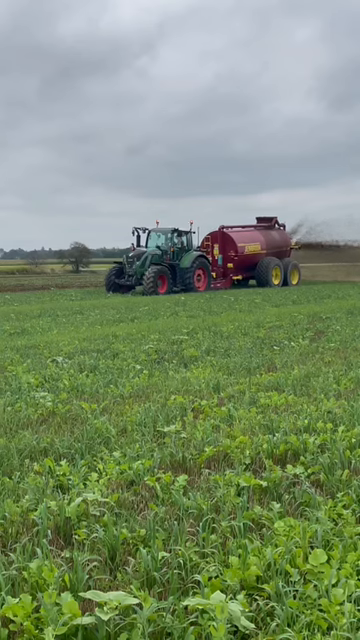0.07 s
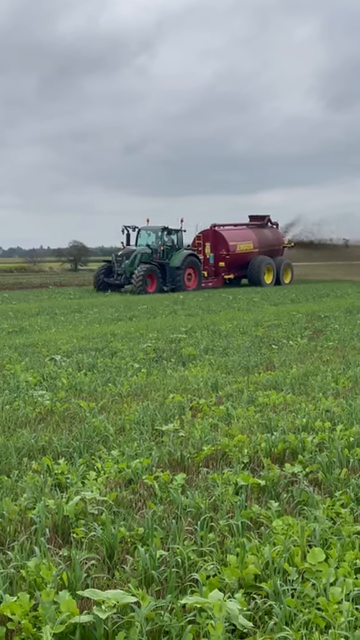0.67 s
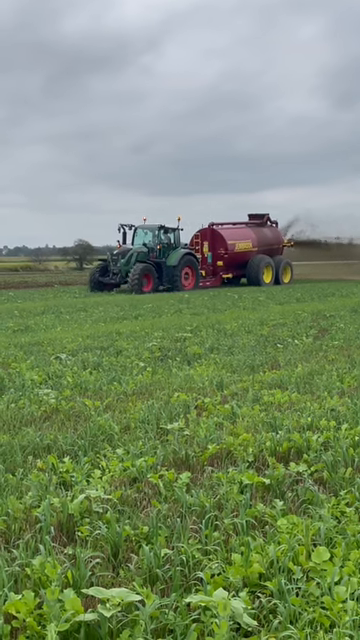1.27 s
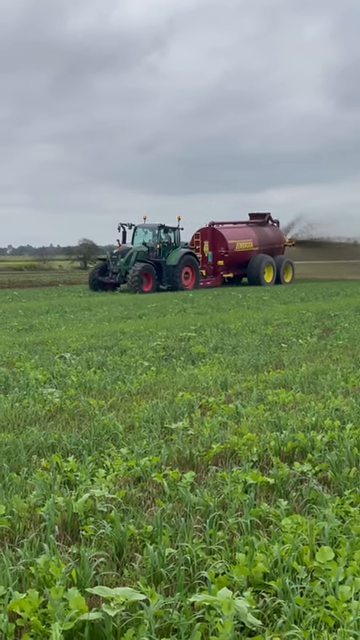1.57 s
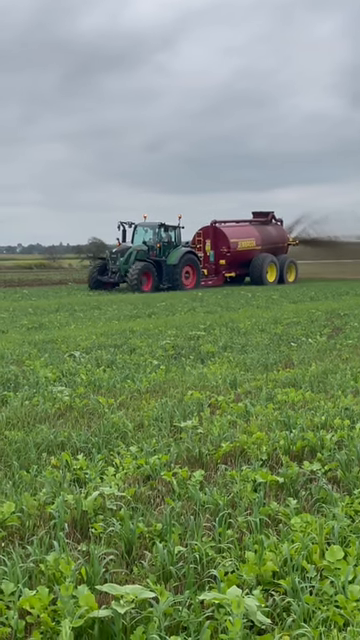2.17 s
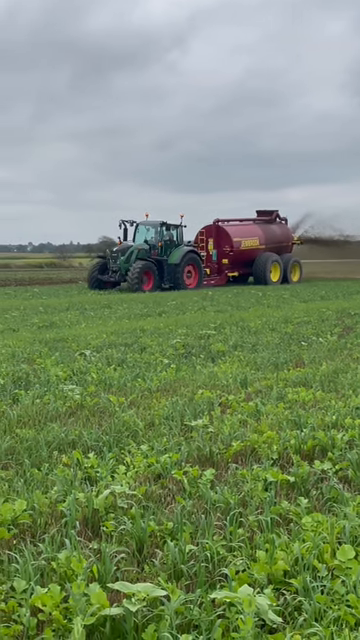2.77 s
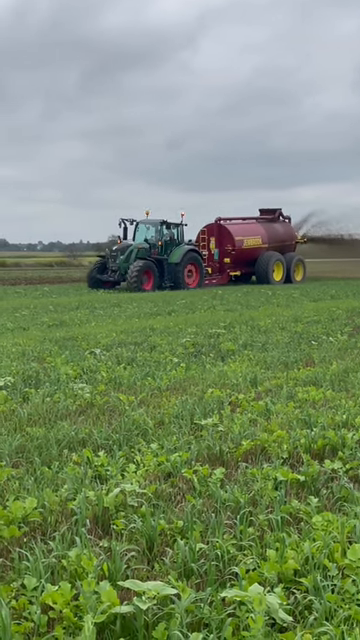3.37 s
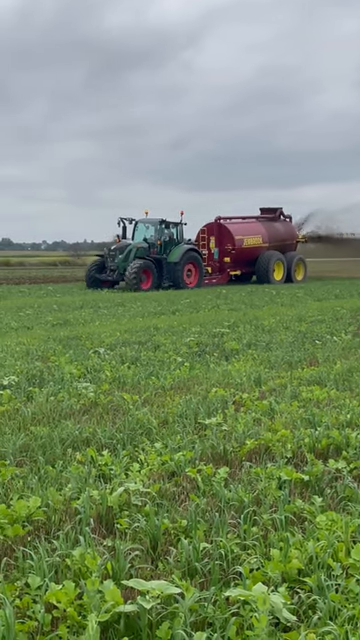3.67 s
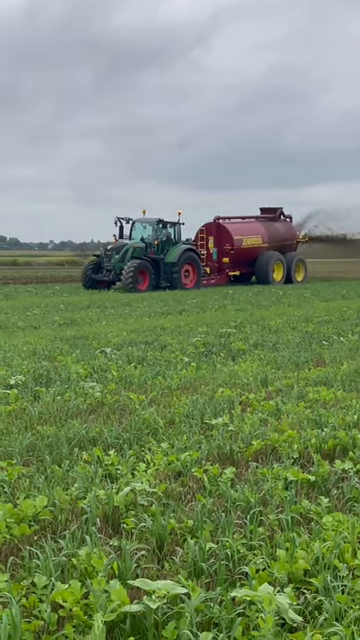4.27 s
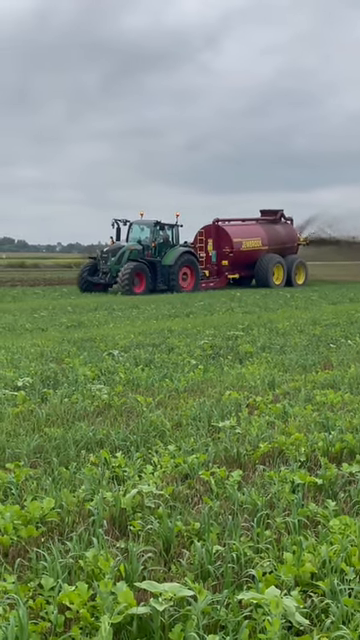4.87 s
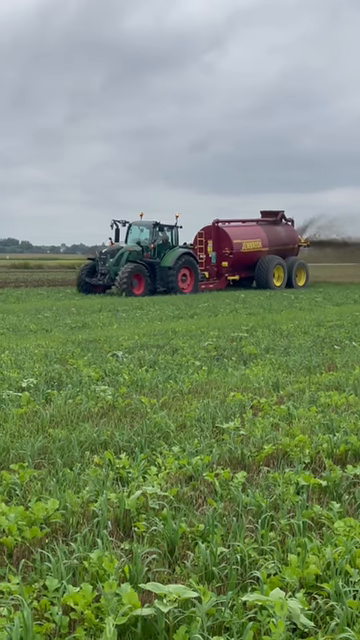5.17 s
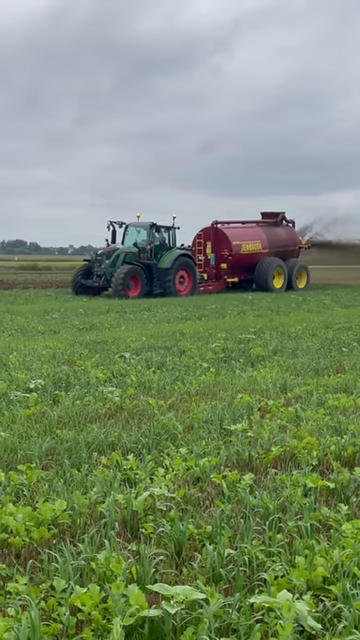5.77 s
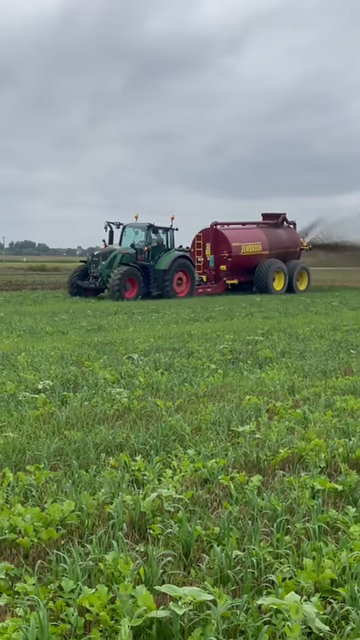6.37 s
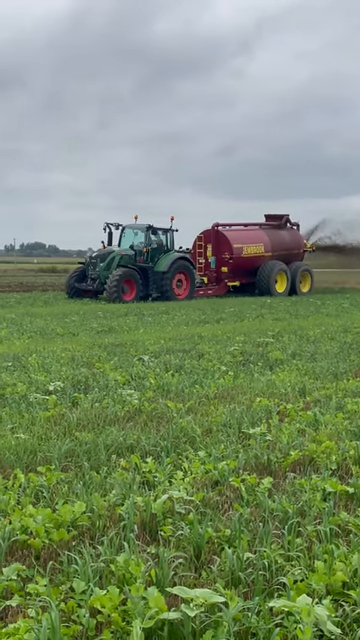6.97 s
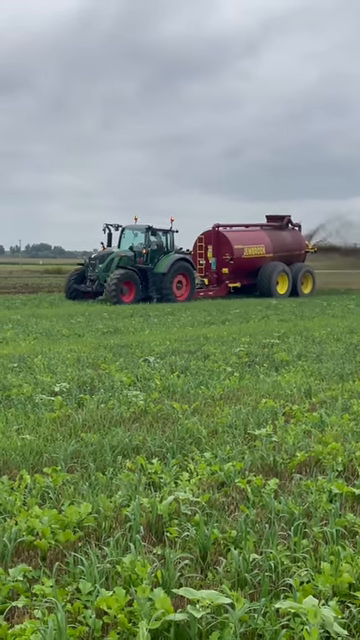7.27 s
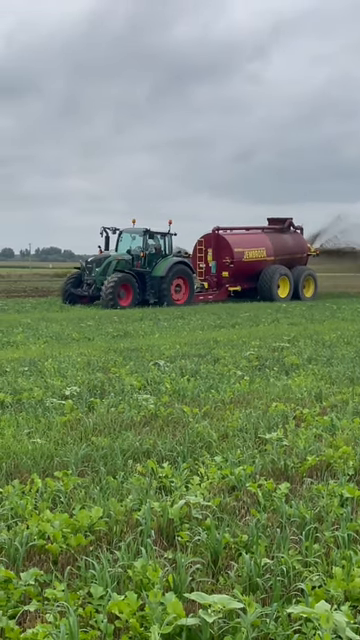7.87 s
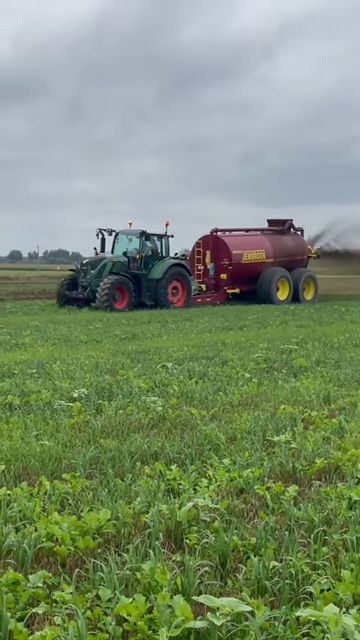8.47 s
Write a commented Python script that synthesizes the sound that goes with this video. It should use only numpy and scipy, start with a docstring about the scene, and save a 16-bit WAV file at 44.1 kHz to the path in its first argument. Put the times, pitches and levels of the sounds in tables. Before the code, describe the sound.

Out in a field, a tractor engine drones without a break, heavy and pulsing in the bass, with diesel clatter on top. The slurry tanker behind it adds a throbbing pump and an even, pattering hiss of spray. A thin gear whine and a soft steel rattle come and go as the machine creeps a little closer, never changing its engine speed.

```python
"""A six-cylinder diesel tractor slowly approaches across an open field, drawing a slurry tanker.
Periodic exhaust pulses beat against the tanker's pump over a lumpy rumble, and the cylinders' knocks
excite the resonances of the block. A panel booms, a fan hums, and gear whine and ringing steel fade
in and out on the breeze. Slurry hisses and patters behind. Two close microphone ports hear the machine."""
import sys
import numpy as np
from scipy import signal
from scipy.fft import rfft, irfft
from scipy.io import wavfile

SR = 44100
rng = np.random.default_rng(int(sys.argv[2]) if len(sys.argv) > 2 else 0)


def to_wav(s):
    """Save 16-bit WAV."""
    ch = np.atleast_2d(s).T  # columns
    pcm = np.round(np.clip(ch, -1, 1) * 32767)  # PCM
    wavfile.write(sys.argv[1], SR, pcm.astype(np.int16))


N = 379701
TIME, HZ = np.arange(N) / SR, np.fft.rfftfreq(N, 1 / SR)
PROGRESS = TIME / TIME[-1] - .5  # -0.5 at the start, +0.5 at the end
SIDES = np.array([[1], [-1]])  # left, right
CYCLE_HZ, PUMP_HZ = 16.095, 33.835  # four-stroke cycles (six firings each); turns of the pump's rotor

def gain_of(db):
    """Amplitude ratio: tenfold for every 20 dB."""
    return 10 ** (np.asarray(db) / 20)

def unit_rms(x):
    """Normalisation to unit mean power."""
    return x / np.sqrt(np.mean(x ** 2) + 1e-20)

def envelope(curve):
    """Amplitude envelope, interpolated in decibels."""
    return gain_of(np.interp(TIME, *np.transpose(curve)))

def nearer(rise_db):
    """Level rises as distance falls: by rise_db in all, with unit gain halfway."""
    return gain_of(rise_db * PROGRESS)

def response(points):
    """Frequency response, interpolated on a logarithmic frequency axis."""
    hz, value = np.transpose(points)
    return np.interp(np.log(HZ + 1), np.log(hz + 1), value)

def coloured(x, spectrum, resonances=()):
    """Source-filter model: a smooth spectrum with Lorentzian peaks and dips; rms 1."""
    peaks_db = sum(lift / (1 + (2 * (HZ - hz) / width) ** 2) for hz, width, lift in resonances)
    return unit_rms(irfft(rfft(x) * gain_of(response(spectrum) + peaks_db), N))

def drift(rate_hz, count=2048):
    """Random fluctuation: noise low-passed at rate_hz; rms 1."""
    hz = np.fft.rfftfreq(count, N / SR / count)
    slow = irfft(rfft(rng.standard_normal(count)) * (hz > 0) / (1 + (hz / rate_hz) ** 2))
    return np.interp(TIME, np.linspace(0, N / SR, count), unit_rms(slow))

def harmonics(turns, orders, fade_db, fade_hz, pulsed=False):
    """Harmonics of a rotation, each fading on its own in moving air; pulsed ones are phase-aligned."""
    total = 0
    for order, db in orders.items():
        phase = round(order) * turns + (0 if pulsed else rng.random())
        fading = gain_of(fade_db * drift(fade_hz))
        total += gain_of(db) * unit_rms(np.sin(2 * np.pi * phase) * fading)
    return total

def ringing(x, hz, width_hz):
    """Forced vibration of a damped resonator whose frequency may move; rms 1."""
    carrier = np.exp(2j * np.pi * np.cumsum(hz * np.ones(N)) / SR)
    pole = np.exp(-np.pi * width_hz / SR)
    return unit_rms((carrier * signal.lfilter([1], [1, -2 * pole, pole * pole], x / carrier)).real)

# Scattered sound at the ports: (frequency [Hz], gain against the direct sound [dB])
PORT_SCATTER = [(100, -32), (360, -36), (560, -25), (800, -16), (1200, -19), (2200, -15), (3100, -11),
                (3600, -11), (6000, -10), (7300, -8), (7800, -26), (8600, -24), (9200, -10), (11000, -17),
                (13000, -14), (14000, -30)]
# Shading by the housing: (frequency [Hz], left minus right level [dB])
PORT_SHADE = [(400, 0), (760, -1), (1000, 0.5), (1400, -1), (1750, -3.5), (2050, 0.5), (2450, 0.5),
              (2900, 2.5), (3250, 12), (3650, 3.5), (4200, 7.5), (5400, 1.5), (6600, 2.5), (8000, -0.5)]
# Delay between the ports: (frequency [Hz], phase lead of the left [rad])
PORT_LEAD = [(20, -.2), (70, -.25), (170, -.39), (250, -.28), (360, 0), (560, 0), (700, .7), (810, 1.5),
             (900, .75), (1100, .45), (1250, .15), (1450, .65), (1620, .35), (1800, .9), (2050, .55),
             (2400, .9), (2700, 2), (2900, 1.6), (3150, 2.3), (3500, .2), (6100, 0), (7500, -2.2),
             (7800, -3), (8600, -3.3), (9000, -4.1), (10100, -4.8), (11000, -6.3), (12500, -6.3),
             (13900, -9.4)]
def ports(direct, scattered):
    """Level and phase differences: the housing shades and delays; scattered sound decorrelates the pair."""
    pair = rfft(direct) + SIDES * rfft(scattered) * gain_of(response(PORT_SCATTER))
    shade = gain_of(SIDES * response(PORT_SHADE) / 2)
    delay = np.exp(1j * SIDES * response(PORT_LEAD) / 2)
    return irfft(pair * delay * shade / np.sqrt(np.mean(shade ** 2, axis=0)), N)

def high_hiss(hz=15100, width_hz=260, level_db=-65.5, rise_db=8):
    """Narrow-band noise: a faint, thin hiss, opposite in the two channels, slowly growing louder."""
    band = irfft(rfft(rng.standard_normal(N)) / (1 + (2 * (HZ - hz) / width_hz) ** 2), N)
    return gain_of(level_db + rise_db * PROGRESS) * unit_rms(band) * SIDES

def panel_boom(level_db=-52.5):
    """Resonance under random forcing: a large panel rings roughly, louder as the tractor nears."""
    shaking = rng.standard_normal(N) * gain_of(2 * drift(7.8))
    return gain_of(level_db) * nearer(rise_db=11) * ringing(shaking, hz=599, width_hz=85)

# Bright steel modes: (frequency [Hz], width [Hz], relative level [dB], share of the swell [0-1])
STEEL_MODES = [(2870, 177, 1, 0.8), (3250, 42, -4, 0.7), (3347, 54, -8, 0.8), (3647, 120, -6, 0.5),
               (4004, 130, -11, .5)]
# Swells in which the breeze carries the ringing: (time [s], level [dB])
STEEL_SWELLS = [(0.05, -55), (1.1, -59), (1.5, -51), (2.4, -54.5), (2.8, -48), (3.55, -62), (3.95, -49),
                (4.6, -50), (6.2, -47), (6.5, -51), (6.8, -51), (6.98, -51), (7.85, -49), (8.6, -61)]
def steel_rattle(cycles, shimmer_db=1.5, rattle_db=2.0, waver_hz=11):
    """Modal vibration: each turn of the crankshaft rattles steel modes that waver and creep upward."""
    swell = envelope(STEEL_SWELLS)
    crank = np.sin(2 * np.pi * 2 * cycles)
    shaking = rng.standard_normal((2, N)) * gain_of(shimmer_db * drift(32) + rattle_db * crank)
    total = 0
    for hz, width, db, share in STEEL_MODES:
        creep_hz = 45 * PROGRESS * width / STEEL_MODES[0][1]  # wider modes creep further
        mode = ringing(shaking, hz + waver_hz * drift(5.4) + creep_hz, width)
        total += gain_of(db) * (swell / swell.mean()) ** share * mode
    return swell.mean() * total

# Spectrum of the spray: (frequency [Hz], relative level [dB])
SPRAY_SPECTRUM = [(300, -12), (1500, -1), (2800, 11), (3800, 4.5), (4500, 7), (5500, 4), (5750, 1),
                  (6600, 2.7), (8000, -3), (9800, 0), (11000, -5.5), (13300, -12), (15600, -16)]
# How well the breeze carries the hiss: (time [s], relative level [dB])
SPRAY_LEVEL = [(0.05, -46), (0.07, -48.5), (6.24, -47), (6.72, -48.5), (7.29, -46.5), (8.5, -47.5),
               (8.6, -46)]
def slurry_spray(drops_per_s=900, surge_db=0.5, pulse_db=0.3):
    """Broadband and shot noise: slurry hisses off the splash plate, pulsing with the pump; clots patter."""
    sizes = 0.58 * gain_of(9 + 2.4 * np.minimum(rng.exponential(1, N), 4))
    drops = sizes * (rng.random(N) < drops_per_s / SR) * rng.choice([-1, 1], (2, N))
    surge = gain_of(surge_db * drift(18) + pulse_db * np.sin(2 * np.pi * PUMP_HZ * TIME))
    hiss = coloured(rng.standard_normal((2, N)) + drops, SPRAY_SPECTRUM)
    return gain_of(1) * envelope(SPRAY_LEVEL) * surge * hiss

# Spectrum of the rumble: (frequency [Hz], relative level [dB])
RUMBLE_SPECTRUM = [(18, -30), (26, -25), (31, -8), (38, -5), (56, -2), (78, 0), (112, -1.5), (155, 0),
                   (185, 2), (218, -4.5), (235, -3.5), (270, -12.5), (350, -23.5), (700, -50), (3000, -94)]
# Swells of the rumble: (time [s], relative level [dB])
RUMBLE_LEVEL = [(0.05, -31.5), (2.6, -29.5), (3.4, -32), (4.05, -27), (4.6, -29.5), (5.4, -31.5),
                (5.7, -24.5), (6.05, -31.5), (6.75, -29.5), (7.4, -27), (7.75, -29.5), (8.6, -30.5)]
def rumble(lump_db=0.43, lump_hz=5):
    """Low-frequency random noise from exhaust flow and lugged tyres on soft, lumpy ground."""
    lumps = gain_of(lump_db * drift(lump_hz))
    noise = coloured(rng.standard_normal((2, N)), RUMBLE_SPECTRUM)
    return gain_of(-3.5) * envelope(RUMBLE_LEVEL) * lumps * noise

# Speed of the fan: (time [s], blade-passing frequency [Hz])
FAN_RATE = [(0.05, 205), (2.53, 212.1), (2.79, 204.1), (5.33, 203.3), (5.57, 207.1), (7.95, 207.1),
            (8.0, 199.6), (8.6, 200.5)]
# Hum of the fan: (harmonic of the blade rate [1], level [dB])
FAN_HARMONICS = {1: -43, 2: -57}
def cooling_fan():
    """Blade-passing tones, wandering in pitch as the fan hunts a little in speed."""
    blade_passes = np.cumsum(np.interp(TIME, *np.transpose(FAN_RATE))) / SR + 0.076 * drift(4.5)
    return harmonics(blade_passes, FAN_HARMONICS, fade_db=2.3, fade_hz=5.6)

# Meshing tones of the timing gears: (harmonic of the cycle rate [1], mid-approach level [dB])
GEAR_HARMONICS = {26: -57, 30: -63.5, 42: -59, 44: -58.5, 45: -65, 60: -53.5, 64: -57.5, 66: -53, 69: -59,
                  82: -56.5, 84: -56, 86: -56, 88: -59, 90: -59, 124: -65.5, 146: -61.5}
# The loudest gear's whine, fading on the breeze: (time [s], relative level [dB])
WHINE_LEVEL = [(0.1, -56), (0.3, -43), (0.5, -45), (0.72, -42), (1.08, -53.5), (1.35, -42.5), (1.75, -63),
               (2.07, -44.5), (2.3, -49), (3.8, -49), (3.98, -44), (4.25, -56), (4.65, -47.5),
               (4.95, -53.5), (5.9, -44), (6.38, -50), (6.65, -41), (6.95, -41.5), (7.25, -56),
               (7.48, -35.5), (7.65, -40.5), (7.9, -43), (8.22, -48.5), (8.45, -42)]
def gears(cycles, teeth_per_cycle=62, flutter_hz=3.55, crest_s=3.96):
    """Gear-mesh tones at the tooth-contact rates; the loudest flutters, most plainly when it is faint."""
    mesh = harmonics(cycles + 0.0015 * drift(7.5), GEAR_HARMONICS, fade_db=4, fade_hz=6.8)
    flutter = gain_of(-55.5) * np.cos(2 * np.pi * flutter_hz * (TIME - crest_s))
    whine = harmonics(cycles, {teeth_per_cycle: 1}, fade_db=1.2, fade_hz=7)
    return nearer(rise_db=5) * mesh + (envelope(WHINE_LEVEL) + flutter) * whine

# Overtones of the pump: (harmonic of the rotor rate [1], level against the strongest [dB])
PUMP_HARMONICS = {3: -4.5, 4: -0.9, 5: 0, 6: -5.5, 7: -12.5}
# The pump's throb and its buzzing overtones, each: (time [s], level [dB])
THROB_LEVEL = [(0.05, -31.5), (1.2, -30), (1.9, -37.5), (2.45, -29.5), (3.35, -34), (3.85, -29),
               (4.5, -33.5), (5.15, -36), (5.7, -31.5), (6.8, -34.5), (7.9, -30), (8.6, -32.5)]
BUZZ_LEVEL = [(0.05, -40), (1.6, -44.5), (2.7, -38.5), (3.5, -45), (4.3, -47.5), (5.3, -39.5), (5.9, -56),
              (6.8, -58), (7.4, -40.5)]
def pump(cycles):
    """Periodic displacement: the engine drives a twin-lobe pump, two strokes to each turn."""
    rotor = cycles * PUMP_HZ / CYCLE_HZ
    throb = envelope(THROB_LEVEL) * np.sin(2 * np.pi * 2 * rotor)
    buzz = envelope(BUZZ_LEVEL) * harmonics(rotor, PUMP_HARMONICS, fade_db=3, fade_hz=2.7, pulsed=True)
    return throb + buzz

def bonnet_rasp(x, hz=2250, width_hz=600, growth=0.16):
    """Directivity: the engine's rasp opens up as the side of the bonnet comes into view."""
    rasp = irfft(rfft(x) / (1 + (2 * (HZ - hz) / width_hz) ** 4), N)
    return x + growth * PROGRESS * rasp

# Spectrum of the engine block: (frequency [Hz], relative level [dB])
BLOCK_SPECTRUM = [(100, -35), (300, -1), (430, -1.5), (560, 2), (660, -2), (760, -0.5), (900, 1),
                  (1150, -1), (1250, -3), (1750, -4.5), (2150, -1), (2700, -8), (4000, -13.5), (6000, -32),
                  (12000, -105)]
# Block and panel resonances, and dips where the ground reflection cancels:
# (frequency [Hz], width [Hz], gain [dB])
BLOCK_RESONANCES = [(594, 30, 3.5), (754, 32, -5), (795, 32, 2.5), (1018, 78, 4.5), (1185, 89, -2),
                    (1422, 440, 5), (1586, 52, -8.5), (1640, 43, 5.5), (1720, 68, -3.5), (2268, 65, -7.5),
                    (2392, 62, 4.5), (2540, 17, 3.5), (2670, 110, -4), (3790, 90, -6.5)]
def block_clatter(cycles, cylinders=6, knock_s=0.012, knock_db=-7, level_db=-38):
    """Impact excitation: cylinders knock in turn, blurred by distance; part of each knock is periodic."""
    period = round(SR / CYCLE_HZ)
    phase = np.arange(period) / period
    since_knock_s = (phase * cylinders % 1) / cylinders / CYCLE_HZ
    blows = np.interp(cycles % 1, phase, 1 + gain_of(knock_db) * np.exp(-since_knock_s / knock_s))
    # equal lines at every multiple of the cycle rate; only the direct row repeats
    pattern = unit_rms(irfft(np.exp(2j * np.pi * rng.random(period // 2 + 1)), period))
    repeated = np.array([np.interp(cycles % 1, phase, pattern), rng.standard_normal(N)])
    fresh = rng.standard_normal((2, N))
    # the repeating share of the power lies mainly between 560 and 2100 Hz
    share = 0.41 / (1 + (HZ / 2100) ** 4) / (1 + (560 / (HZ + 1)) ** 4)
    knocks = irfft(rfft(blows * repeated) * np.sqrt(share) + rfft(blows * fresh) * np.sqrt(1 - share), N)
    flutter = gain_of(0.7 * drift(29))
    block = coloured(knocks, BLOCK_SPECTRUM, BLOCK_RESONANCES)
    return gain_of(level_db) * nearer(rise_db=2) * flutter * block

# Firing tones of the exhaust: (harmonic of the cycle rate [1], mid-approach level [dB])
EXHAUST_HARMONICS = {3: -52, 4: -43, 6: -38.5, 9: -49, 12: -46, 14: -50.5}
def exhaust(cycles):
    """A periodic pulse train has a line spectrum; its tones beat against the pump's, so the bass throbs."""
    pulses = harmonics(cycles, EXHAUST_HARMONICS, fade_db=0.6, fade_hz=0.33, pulsed=True)
    return nearer(rise_db=4) * pulses

def scene(in_step_s=0.45):
    """Superposition of sources at a governed engine speed; pump and exhaust coincide near in_step_s."""
    cycles = CYCLE_HZ * (TIME - in_step_s) + 0.0059 * drift(0.51) + 0.0007 * drift(8.2)
    clatter = bonnet_rasp(block_clatter(cycles))
    # each noisy layer has two rows: direct and scattered sound
    direct, scattered = clatter + steel_rattle(cycles) + rumble() + slurry_spray()
    drone = exhaust(cycles) + gears(cycles) + pump(cycles) + cooling_fan()
    return ports(direct + drone + panel_boom(), scattered) + high_hiss()

def record(dry, open_s=0.034, fade_s=0.005, cutoff_hz=15700):
    """Gating and band limiting: the sound opens after a moment and passes a low-pass filter."""
    opened = np.clip((TIME - open_s) / fade_s, 0, 1)
    lowpass = signal.firwin(511, cutoff_hz, window=("kaiser", 9), fs=SR)
    return signal.oaconvolve(dry * opened, lowpass[None], "same")

dry = scene()
out = record(dry)
to_wav(out)
```